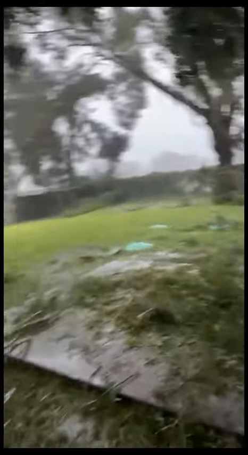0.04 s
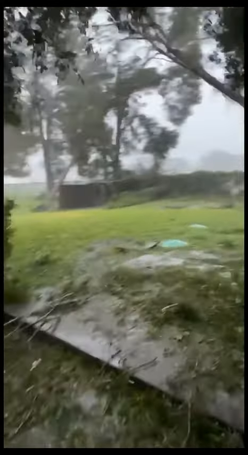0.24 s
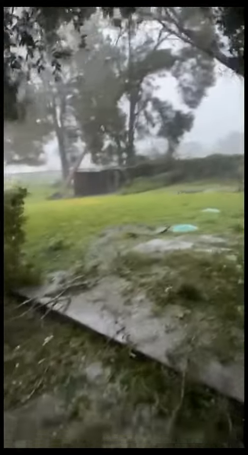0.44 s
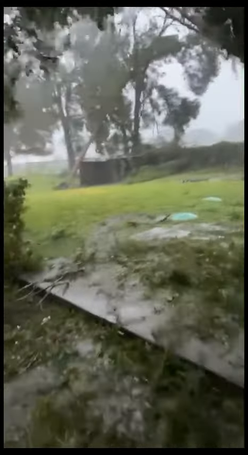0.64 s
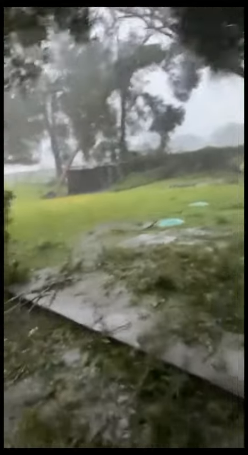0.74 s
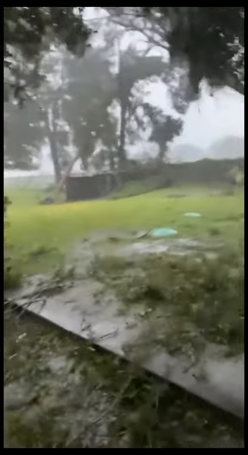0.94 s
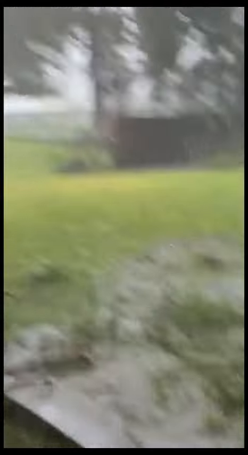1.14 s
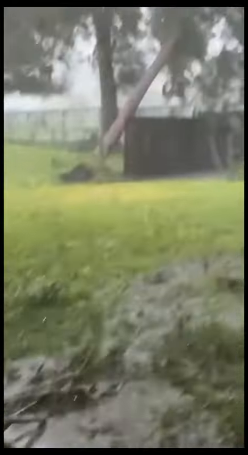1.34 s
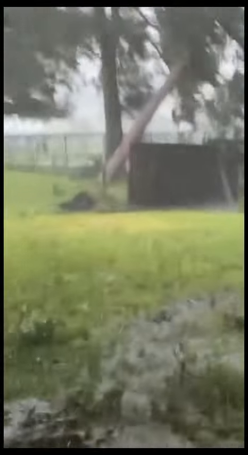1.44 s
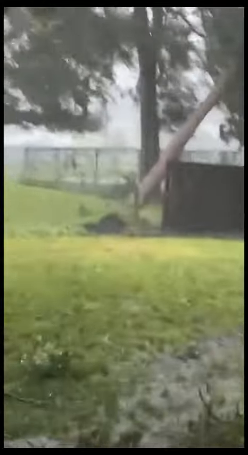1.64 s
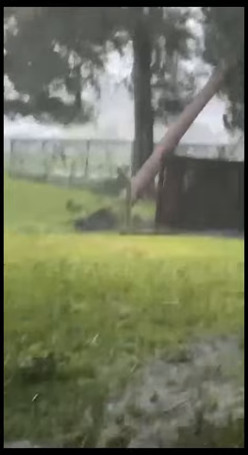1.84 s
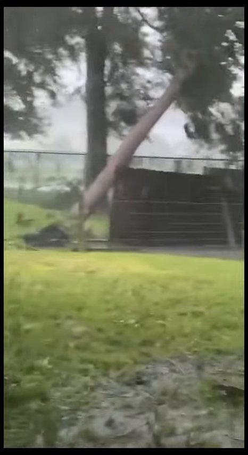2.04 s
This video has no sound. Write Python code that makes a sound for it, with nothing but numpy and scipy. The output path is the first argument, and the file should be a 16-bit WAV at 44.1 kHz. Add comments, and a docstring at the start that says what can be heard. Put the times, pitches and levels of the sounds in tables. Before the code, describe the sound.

Deep, lumpy wind buffeting overloads a handheld microphone on an open lawn, building to a peak then dropping away, with a steady wash of rain, crisp close drops and a faint low roar in the trees.

```python
"""Heavy rain falls on a lawn and trees in a storm: a wide wash, a patter of drops and a few close ticks.
The wash is shaped noise, the patter is many tiny fading tones, and each tick is a snap, a ring and a splash.
Gusts blow across a small microphone: slow eddies rumble, fast ones buffet, and a limiter holds the peaks.
Behind them, low shaped noise makes the roar of wind in the trees."""
import sys
import numpy as np
from scipy import signal
from scipy.fft import rfft, irfft
from scipy.io import wavfile
from scipy.ndimage import uniform_filter1d, minimum_filter1d, map_coordinates

SR = 44100
rng = np.random.default_rng(int(sys.argv[2]) if len(sys.argv) > 2 else 0)


def transcribe(signal):
    """Save signal, clipped to [-1, 1], as a 16-bit WAV file at the path in sys.argv[1]."""
    frames = np.atleast_2d(signal).T
    limited = np.clip(frames, -1, 1)
    pcm = np.round(limited * 32767).astype(np.int16)
    wavfile.write(sys.argv[1], SR, pcm)


N = 92610  # samples, 2.1 seconds

# The tone of the rain, shared by wash and patter. Each row: frequency in Hz, relative level in dB per Hz.
RAIN_TONE = [(40, -20), (120, 3), (300, 1.5), (600, 3), (1200, 2.5), (2500, -2.5), (3900, -2), (5500, -5),
             (8500, -4), (10500, -9.5), (13000, -10.5), (15500, -6.5)]

PUFF_FALL_S = 0.0057  # seconds for a puff to fade to 37 %


def gain_of(db):
    """Turns decibels into a plain multiplier."""
    return 10 ** (np.asarray(db) / 20)


def evened(x):
    """Scales a signal to an average (RMS) size of one."""
    return x / np.sqrt(np.mean(x ** 2) + 1e-20)


def level_at(points, hz):
    """Reads a spectrum table at any frequency, in straight lines along a logarithmic pitch scale."""
    table_hz, level_db = np.transpose(points)
    return np.interp(np.log(hz + 1), np.log(table_hz + 1), level_db)


def curve(table, column):
    """Joins the rows of a table, timed in seconds, into one value per sample."""
    rows = np.array(table)
    return np.interp(np.arange(N) / SR, rows[:, 0], rows[:, column])


def add(mix, start, sound):
    """Adds a sound into the mix from its start in seconds, cut off at the end of the mix."""
    part = mix[round(start * SR):][:len(sound)]
    part += sound[:len(part)]


def coloured(points, size):
    """Noise with the given spectrum: each frequency of white noise is scaled by the table."""
    hz = np.fft.rfftfreq(size, 1 / SR)
    spectrum = rfft(rng.standard_normal(size)) * gain_of(level_at(points, hz))
    return evened(irfft(spectrum, size))


def smooth_chance(seconds):
    """A random wobble of unit size: noise averaged twice over the given time."""
    width = max(round(seconds * SR), 1)
    once = uniform_filter1d(rng.standard_normal(N), width)
    return evened(uniform_filter1d(once, width))


def steadied(x, seconds):
    """Divides out most of the chance swings of loudness that last longer than the given time."""
    power = uniform_filter1d(x ** 2, max(round(seconds * SR), 1))
    return evened(x / np.sqrt(power + 0.3))  # the 0.3 keeps quiet moments from being raised too far


def wash():
    """Distant rain and leaves: shaped noise with drifting patches of pitch and a flicker at all pitches."""
    wash_db, patch_db, flicker_db = 2.5, 0.99, 0.22  # level before the rain's own curve; sizes of the changes
    frames = N // 64 + 5  # one frame every 64 samples
    patches = rng.standard_normal((frames, 129)).T
    patches = uniform_filter1d(patches, size=6, axis=0)  # neighbouring pitches move together
    patches = evened(uniform_filter1d(patches, size=40, axis=1))  # and drift over time
    flicker = evened(uniform_filter1d(rng.standard_normal(frames), size=12))
    spectra = signal.stft(coloured(RAIN_TONE, size=N), nperseg=256, noverlap=192)[2]
    change_db = (patch_db * patches + flicker_db * flicker)[:, :spectra.shape[1]]
    changed = signal.istft(spectra * gain_of(change_db), nperseg=256, noverlap=192)[1][:N]
    return gain_of(wash_db) * evened(changed)


def patter():
    """Many small drops, each a tone that fades within a few turns at one of 24 pitches; a few are large."""
    patter_db, drops_per_s, spread_db = -9, 790, 5  # level before the rain's own curve, rate, spread of sizes
    lowest_hz, highest_hz, turns = 1410, 16200, 1.2  # each tone fades to 37 % in this many turns
    size = gain_of(spread_db * np.minimum(rng.exponential(1, N), 4))
    size = size * (rng.random(N) < drops_per_s / SR)  # zero where no drop lands
    kind = rng.integers(0, 24, N)
    t = np.arange(600) / SR
    out = np.zeros(N)
    for k, hz in enumerate(np.geomspace(lowest_hz, highest_hz, num=24)):
        grain = np.exp(-t * hz / turns) * np.sin(2 * np.pi * hz * t)
        grain *= hz * gain_of(level_at(RAIN_TONE, hz))  # high tones are short, so hz makes them stronger
        out += signal.oaconvolve(size * (kind == k), grain)[:N]
    return gain_of(patter_db) * evened(out)


def rain():
    """The wash and the patter get louder and softer together along one level curve."""
    # How loud the rain is heard; it dips for a moment near 1.4 s. Each row: time in seconds, level in dB.
    rain_level = [(0, -28), (.42, -26), (.63, -28), (1.17, -28), (1.22, -31.5), (1.3, -34), (1.41, -35.5),
                  (1.44, -30), (1.75, -30), (2.1, -30.5)]
    return (wash() + patter()) * gain_of(curve(rain_level, column=1))


def drops():
    """A wide snap, a short ring and a brief splash near the same pitch for each close drop."""
    # Close drops. Each row: start in seconds, level in dB, ring pitch in Hz, turns for the ring to fade
    # to 37 %, splash level in dB relative to the drop.
    close_drops = [(.1937, -12, 7240, 1.4, -20), (0.1992, -10, 6800, 1.4, -20),
                   (0.2452, -4, 1800, 0.81, -22), (0.296, -8, 2200, 0.95, -13), (.303, -13, 8400, 1.3, -13),
                   (.3146, -11, 15000, 14, -17.5), (.364, -15.5, 3640, 1.5, -11),
                   (.4893, -15, 14000, 5, -14), (.5472, -11, 7000, 2, -19), (.6843, -16, 14000, 5, -13),
                   (.7794, -14.5, 11000, 2.5, -22), (.918, -11.5, 4100, 3.2, -10.5),
                   (1.0642, -15.5, 4160, 3, -11), (1.1444, -17, 7940, 2.5, -15),
                   (1.1893, -8, 7000, 0.7, -15.5), (1.28, -12, 8500, 3.2, -14),
                   (1.421, -26, 4500, 2.9, -12), (1.5511, -7.5, 14500, 1.3, -18),
                   (1.5694, -14.5, 5100, 0.99, -13), (1.6899, -20, 4600, 1.2, -4),
                   (1.7614, -17.5, 3030, 2, -6.5), (1.9191, -20, 3540, 1.8, -7),
                   (2.0034, -13, 9200, 2.3, -17)]
    snap_level, snap_s = .9, .000025  # snap strength beside the ring; its time scale in seconds
    splash_s, splash_wide = 0.0093, 0.64  # fading time in seconds; share of bright hiss
    out = np.zeros(N)
    t = np.arange(2500) / SR
    age = t / snap_s
    snap = snap_level * (1 - age / 2) * age * np.exp(1 - age)  # a push, then a pull
    hisses = rng.standard_normal((len(close_drops), len(t)))
    for (start, db, hz, turns, splash_db), hiss in zip(close_drops, hisses):
        ring = np.exp(-t * hz / turns) * np.sin(2 * np.pi * hz * t)
        pitched = evened(np.convolve(hiss, ring)[:len(t)])
        bright = splash_wide * np.diff(hiss, prepend=0)
        splash = gain_of(splash_db) * (pitched + bright) * np.exp(-t / splash_s)
        add(out, start, gain_of(db) * (splash - ring - snap))
    return out


def puff(length, db, first, last, eddies):
    """Eddies swept past the port hit at once; the faster the air, the higher they sound."""
    rise_s = 0.0022
    t = np.arange(0, length + 6 * PUFF_FALL_S, 1 / SR)
    speed = np.clip(np.interp(t, [0, length], [first, last]), .2, 2.9)
    place = np.cumsum(speed)  # how far along the eddies the air has moved
    shape = np.minimum(t / rise_s, 1) * np.exp(-np.maximum(t - length, 0) / PUFF_FALL_S)
    return gain_of(db) * shape * map_coordinates(eddies, [place], order=1)


def buffets():
    """Puffs of fast air strike the microphone, and a quick random wobble makes them lumpy."""
    # Puffs of fast air. Each row: start in seconds, length in seconds before the fade, level in dB,
    # eddy speed at the start and at the end as shares of the usual speed.
    puffs = [(0.3179, 0.0094, -17.5, 1.18, 1.6), (0.523, 0.021, -28.5, 0.63, 0.44),
             (0.631, .016, -25, 0.5, 1.3), (.652, 0.032, -10, 0.71, 0.94), (.69, 0.025, -11.5, 0.81, 1.02),
             (0.723, 0.013, -14.5, 0.71, 0.77), (.76, 0.022, -15, 1.03, 1.02),
             (.85, 0.02, -16.5, 0.54, 0.42), (.929, 0.012, -11.5, 1.71, 2.39),
             (0.941, 0.025, -8.5, .9, 0.8), (.985, 0.035, -9, 0.99, 1.45), (1.024, 0.015, -8, 1.15, 1.01),
             (1.062, 0.016, -17.5, 0.84, 0.6), (1.105, 0.02, -12, 0.97, 0.97),
             (1.142, .016, -14, 1.2, 0.75), (1.172, .03, -7.5, .9, 1.1), (1.208, 0.0278, -4.5, 1.31, 1.05),
             (1.242, 0.037, -6, 1.23, 1.05), (1.283, 0.023, -8, 1.2, 1.05),
             (1.306, 0.029, -13.5, 1.05, 1.3), (1.522, 0.027, -27.5, 0.65, 0.82),
             (1.572, 0.0064, -19, 0.97, 0.78), (1.626, 0.018, -12, .8, 0.56), (1.712, 0.013, -32, 0.31, .6)]
    # Tone of the eddies at the usual speed. Each row: frequency in Hz, relative level in dB per Hz.
    buffet_tone = [(60, -78), (130, -11.5), (200, 4.5), (350, -1.5), (600, -10), (1000, -24.5), (1700, -36),
                   (4000, -72)]
    lump_db, lump_s, even_s = 3.5, 0.0054, 0.0129  # wobble size; averaging times in seconds
    out = np.zeros(N)
    for start, length, db, first, last in puffs:
        eddies = steadied(coloured(buffet_tone, size=8192), even_s)
        add(out, start, puff(length, db, first, last, eddies))
    return out * gain_of(lump_db * smooth_chance(lump_s))


def rumble():
    """Slow eddies push on the microphone: low shaped noise that swells and sinks."""
    # Tone of the slow eddies. Each row: frequency in Hz, relative level in dB per Hz.
    rumble_tone = [(15, -66), (35, -21.5), (60, -5), (100, -9.5), (160, -15), (300, -35.5), (800, -59)]
    # Swells of the slow eddies. Each row: time in seconds, level in dB.
    swell = [(0.0, -32), (0.15, -32.5), (0.2, -27.5), (0.29, -36), (0.34, -19.5), (0.38, -35.5),
             (0.54, -19), (0.57, -26.5), (0.63, -20.5), (0.67, -12.5), (0.81, -13), (0.82, -22.5),
             (0.89, -8), (0.92, -17), (0.95, -10), (0.98, -13.5), (1.02, -7.5), (1.05, -15), (1.08, -10),
             (1.11, -19), (1.18, -6.5), (1.2, -11.5), (1.25, -7.5), (1.29, -11.5), (1.36, -12),
             (1.39, -38.5), (1.52, -17), (1.57, -25.5), (1.6, -8.5), (1.62, -36), (1.64, -20), (1.67, -21),
             (1.72, -13.5), (1.78, -28), (1.8, -23.5), (1.89, -24.5), (1.91, -29), (1.96, -25.5),
             (2.02, -36), (2.1, -30)]
    return steadied(coloured(rumble_tone, size=N), 0.0368) * gain_of(curve(swell, column=1))


def roar():
    """The low roar of wind in the trees: shaped noise that follows a level curve."""
    # Tone of the roar. Each row: frequency in Hz, relative level in dB per Hz.
    roar_tone = [(50, -38), (110, -4.5), (200, 5.5), (400, 4.5), (800, -13), (2000, -38)]
    # How loud the roar is heard. Each row: time in seconds, level in dB.
    roar_level = [(0, -33), (.3, -32), (.6, -33.5), (1.3, -29), (1.45, -41), (1.8, -34), (2.1, -36)]
    return coloured(roar_tone, size=N) * gain_of(curve(roar_level, column=1))


def limited(x, ceiling, seconds):
    """Turns the gain down smoothly around every peak above the ceiling."""
    width = max(round(seconds * SR), 1)
    needed = ceiling / np.maximum(abs(x), ceiling)
    lowest = minimum_filter1d(needed, width)
    return x * uniform_filter1d(lowest, width)


def scene():
    """Rain, close drops, gusts and the roar behind them, added into one channel."""
    return (rain() + drops() + buffets() + rumble() + roar())[None]


def record(dry):
    """A limiter on the low band holds the gust peaks, a quicker one guards the whole; then the band limit."""
    split_hz, edge_hz = 1200, 15780  # top of the low band; top of the whole sound
    low = signal.sosfiltfilt(signal.butter(2, split_hz, fs=SR, output="sos"), dry)
    high = dry - low
    held = limited(high + limited(low, ceiling=.8, seconds=.006), ceiling=.88, seconds=.001)
    band_limit = signal.firwin(1023, edge_hz, window=("kaiser", 9), fs=SR)
    return signal.oaconvolve(held, band_limit[None], "same")


dry = scene()
out = record(dry)
transcribe(out)
```